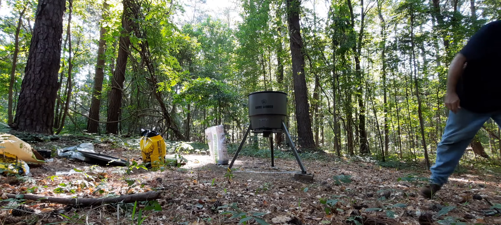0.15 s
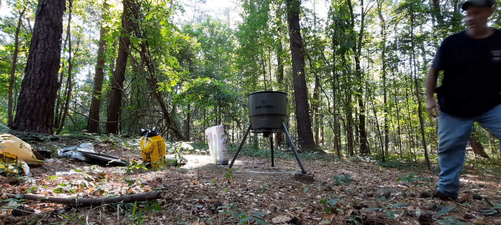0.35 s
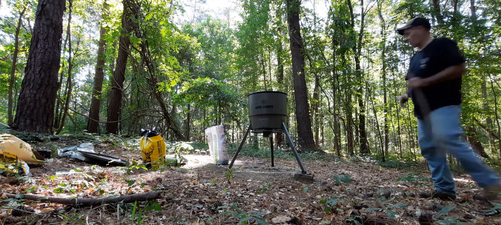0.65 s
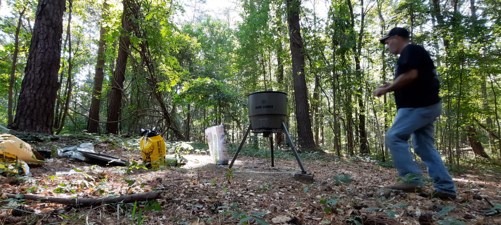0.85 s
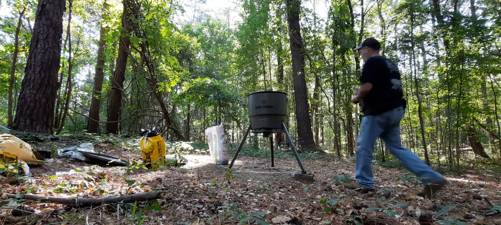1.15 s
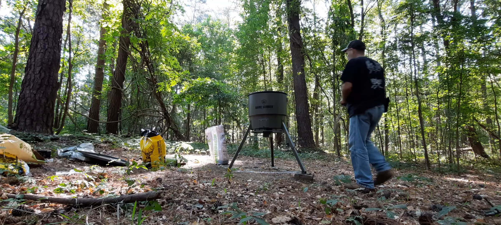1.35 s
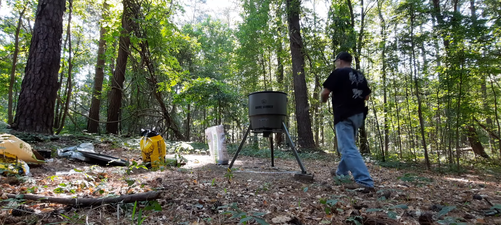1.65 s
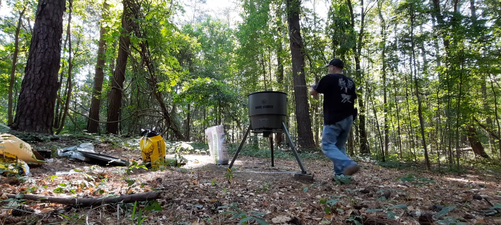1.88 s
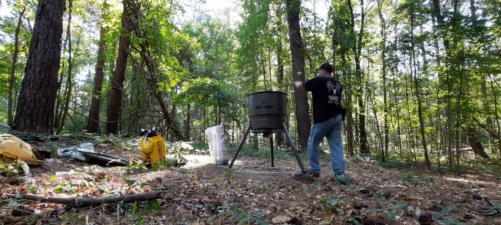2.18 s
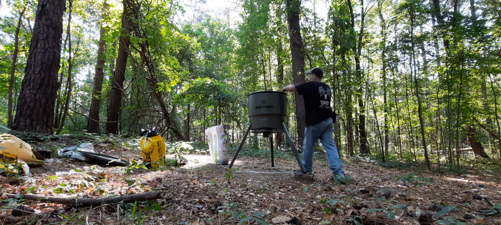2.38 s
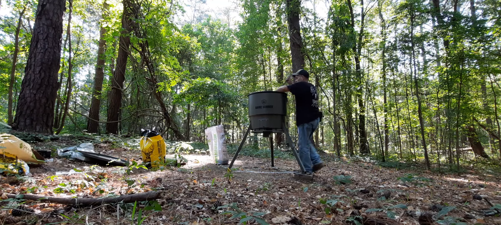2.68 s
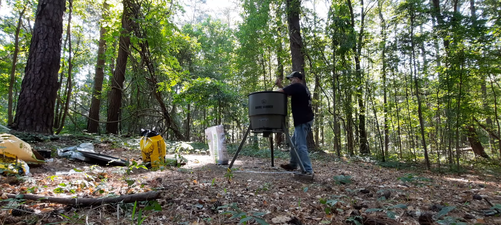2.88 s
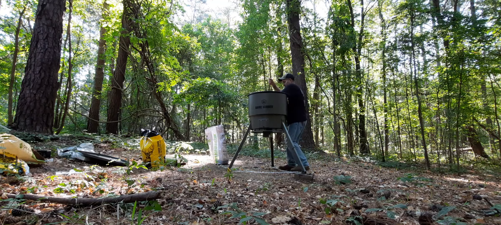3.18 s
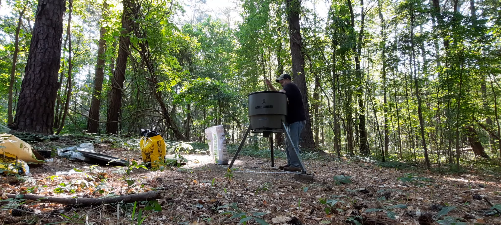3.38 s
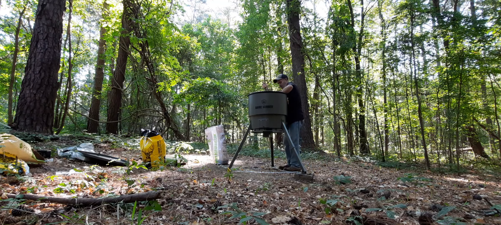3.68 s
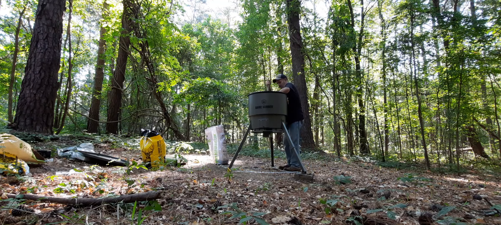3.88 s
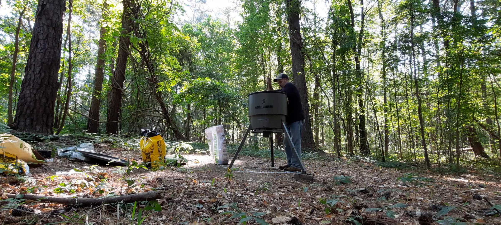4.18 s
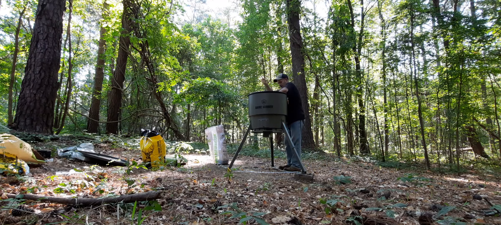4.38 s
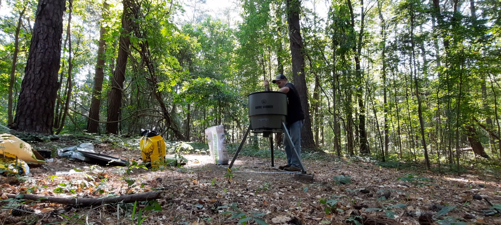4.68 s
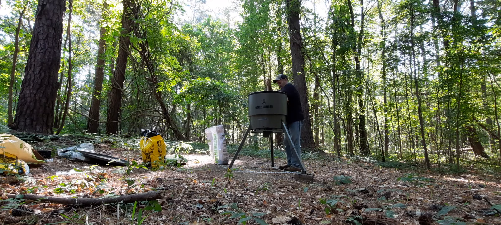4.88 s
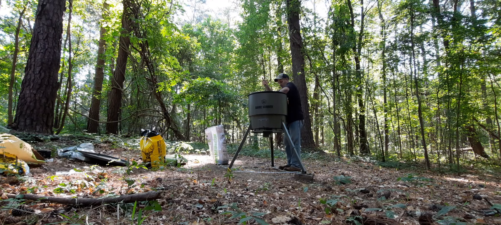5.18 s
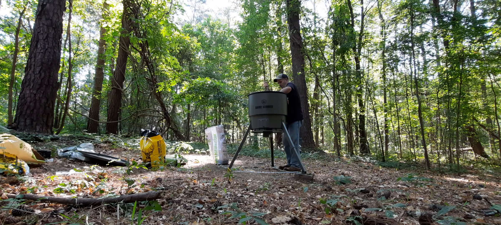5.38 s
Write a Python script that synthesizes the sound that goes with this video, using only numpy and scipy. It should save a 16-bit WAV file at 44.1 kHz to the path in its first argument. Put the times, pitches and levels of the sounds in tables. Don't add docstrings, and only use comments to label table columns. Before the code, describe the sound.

Footsteps crunch through dry leaves and snapping twigs in a quiet wood, then corn rattles into a drum hopper in growing surges.

```python
import sys
import numpy as np
from scipy import signal
from scipy.fft import rfft, irfft, next_fast_len
from scipy.io import wavfile
from scipy.ndimage import uniform_filter1d

SR = 44100
rng = np.random.default_rng(int(sys.argv[2]) if len(sys.argv) > 2 else 0)


def gain_from_decibels(decibels):
    exponent = np.asarray(decibels, float) / 20
    return 10 ** exponent


def unload_wav(signal):
    wavfile.write(
        sys.argv[1],
        SR,
        np.round(np.clip(np.atleast_2d(signal).T, -1, 1) * 32767).astype(np.int16),
    )


N = 244314
SIZE = next_fast_len(N + 8192)
HZ = np.maximum(np.arange(SIZE // 2 + 1) * SR / SIZE, 1)
POUR_START_S = 2.86

# time_s, level_db
RUMBLE = [(0.0, -67), (0.23, -58.5), (0.46, -61.5), (1.46, -60), (1.5, -65), (1.8, -56.5), (1.9, -71),
          (1.94, -54.5), (2.33, -65.5), (2.56, -57.5), (3.55, -57), (3.59, -50), (4.4, -53.5),
          (4.95, -46.5), (5.15, -50.5), (5.54, -48)]
# frequency_hz, density_db
GROUND_SPECTRUM = [(15, -65), (28, -37), (50, -7), (101, -0.5), (122, 0.5), (140, -18), (179, -8.5),
                   (260, -33.5), (340, -33), (570, -120)]
# frequency_hz, width_hz, level_db
STAND_MODES = [(124.5, 34, 2.5), (168.7, 28.3, 4.5), (185.4, 31.6, 1)]
# frequency_hz, density_db
WOOD_SPECTRUM = [(150, -25), (230, -1), (320, 3), (430, -11), (900, -4), (1570, -3.5), (3000, -10.5),
                 (4500, -18), (5600, -11.5), (6700, -12), (9550, -24), (10700, -21), (11300, -12.5),
                 (12000, -22), (16000, -27)]
# frequency_hz, likeness (0 to 1)
WOOD_ALIKE = [(60, 0.9), (130, 0.97), (200, 0.96), (290, 0.69), (640, 0), (1400, 0.)]
# frequency_hz, likeness (0 to 1)
NEAR_ALIKE = [(100, 1), (300, 0.99), (700, 0.84), (1500, 0.91), (3000, 0.8), (7000, 0.26), (15000, 0.44)]
# frequency_hz, lag_samples
PORT_LAG = [(500, 2), (2700, 2.1), (7000, 1.61), (14000, 3.37)]

# peak_s, rise_s and fall_s over 20 dB, crisp_db, sole_weight_db
STEPS = [(.22, 0.46, 0.63, -67, -9), (.354, 0.049, 0.27, -69.5, 1), (.848, 0.0047, 0.34, -50, -6.5),
         (.93, 0.072, 0.17, -56, 3.5), (.971, 0.062, 0.2, -47.5, 0), (1.019, 0.16, .1, -49.5, -2),
         (1.06, 0.11, 0.051, -49.5, -0.5), (1.13, .15, 0.15, -61.5, 0), (1.27, 0.12, 0.19, -64.5, -9),
         (1.49, 0.023, 0.1, -64, -6), (1.665, 0.078, 0.36, -63.5, -4), (1.916, 0.1, 0.088, -61, -14),
         (2.0, 0.024, 0.048, -57.5, 5), (2.04, 0.089, 0.18, -60, -5.5), (2.39, 0.19, 0.17, -70, 1),
         (2.74, 0.02, 0.064, -64, 3), (2.83, .1, 0.069, -78, 11), (2.93, 0.051, 0.16, -53.5, -7)]
# frequency_hz, density_db
LEAF_SPECTRUM = [(3500, -28), (5000, -11), (6000, -10.5), (7600, -12.5), (11000, -12), (16000, -7)]
TWIG_SPECTRUM = [(2400, -65), (2700, 1.5), (3500, 0), (4500, -3.5), (6000, -17)]
SOLE_SPECTRUM = [(90, -88), (150, -8.5), (400, 1), (700, -11), (1000, -5), (1600, -6.5), (2100, -5),
                 (2400, -38)]
# time_s, peak_db, edge_db and middle_db re peak
TWIGS = [(0.045, -60, -20, -25), (0.095, -61.5, -21, -25), (0.135, -56, -20, -25), (0.179, -54, -14, -7),
         (0.207, -47, -22, -13), (0.849, -30.5, -12, -17), (0.8615, -36, -13, -18), (0.902, -46, -17, 7),
         (0.962, -40, -1, -20), (0.965, -32, -1, -18), (0.9958, -43, -2, 10), (1.0116, -34, -5, -2),
         (1.039, -39, 1, -3), (1.071, -50, -12, 3), (1.37, -55, -16, -26), (1.486, -56, -20, -26),
         (1.894, -53, -7, -20), (1.9808, -31.5, -7.5, -40), (1.984, -32, -8, -43), (1.9868, -28, -7, -40),
         (2.1779, -57, 0, -22), (2.3945, -52, -6, -22), (2.6044, -67, 6, -15), (2.733, -52.5, -5, -12),
         (2.82, -58, 2, -10)]
# time_s, peak_db, heaviness_db
CLUMPS = [(2.92, -44, 4), (3.0415, -59, -15.5), (3.064, -41, 9.5), (3.09, -31.5, 1), (3.193, -50, 8),
          (3.254, -40, 3), (3.2783, -40, -2), (3.308, -42, 8), (3.393, -50.5, 15), (3.628, -31, -12),
          (3.64, -28, -17), (3.7035, -31, -42), (3.8417, -39, -8), (4.1995, -33, -16), (4.2475, -28.5, 3.5),
          (4.261, -35, 6), (4.2687, -29, 8), (4.2914, -23.5, 2), (4.306, -25, 2), (4.3094, -27, -8),
          (4.317, -39, 17), (4.57, -37, -13), (4.995, -30, -7), (4.999, -34, 4.5), (5.065, -34, -2.5),
          (5.1467, -36, -17), (5.1735, -27.5, 2), (5.324, -31, -13)]
CLUMP_SHARES_DB = [-16, -44, -18.5]
# low_hz, high_hz, level_db
SNAP_BANDS = [(11400, 21000, 7), (5180, 8900, 11.5), (3040, 4600, 13), (550, 2600, 13)]

# time_s, pitch_hz, level_db
WHISTLE = [
    (.05, 3440, -76),
    (.1, 3460, -70),
    (.2, 3380, -65),
    (.27, 3240, -64),
    (.34, 3160, -64),
    (.42, 3140, -73),
    (.6, 3110, -80),
    (.75, 3100, -92),
]
# time_s, pitch_hz, level_db
SEEP = [
    (.7, 8720, -84),
    (.76, 8680, -73),
    (.82, 8580, -72),
    (.86, 8500, -78),
]
# time_s, pitch_hz, level_db
CHIRP = [
    (1.43, 1980, -80),
    (1.47, 2090, -71),
    (1.51, 2020, -71),
    (1.54, 1770, -67),
    (1.57, 1630, -71),
    (1.63, 1650, -76),
    (1.7, 1750, -82),
]
# time_s, pitch_hz, level_db
COO = [
    (1.4, 1607, -76),
    (1.46, 1650, -67),
    (1.53, 1555, -73),
    (1.56, 1560, -92),
]

# time_s, peak_db
TICKS = [(.8617, -37), (.8676, -40), (.9657, -32), (.9693, -37), (1.0126, -33), (1.049, -40), (1.3857, -58),
         (1.6157, -59), (1.9528, -57), (2.1256, -58), (2.3646, -59), (2.9198, -44), (3.0427, -49),
         (3.1183, -31), (3.1286, -31), (3.1935, -40), (3.3069, -42), (3.5518, -45), (3.5807, -40),
         (3.624, -31), (3.64, -21), (3.6784, -28), (3.7055, -29), (3.7245, -24), (3.7274, -28),
         (3.7588, -30), (3.8416, -32), (3.8602, -28), (4.2473, -20), (4.25, -31), (4.2522, -31),
         (4.2613, -29), (4.2695, -22), (4.3055, -22), (4.31, -21), (4.3165, -22), (4.381, -25),
         (4.4774, -24), (4.5422, -25), (4.5699, -30), (4.5979, -30), (4.6692, -22), (4.7735, -22),
         (4.9345, -29), (4.9949, -27), (5.0623, -19), (5.1466, -32), (5.2061, -30), (5.2516, -34),
         (5.2952, -35), (5.3145, -35), (5.3219, -27), (5.3249, -31), (5.3491, -32), (5.434, -25),
         (5.5098, -26)]

# peak_s, rise_s and fall_s over 20 dB, flow_db, upper_wall_share_db
SURGES = [(2.93, 0.039, 0.071, -58.5, -1.5), (2.982, 0.041, 0.025, -49, -1), (3.07, 0.014, 0.11, -45, -20),
          (3.118, 0.051, 0.058, -41, -6), (3.17, 0.26, 0.13, -51.5, 3), (3.27, 0.026, 0.56, -56, 2.5),
          (3.61, 0.18, .1, -56.5, 9), (3.627, 0.0096, 0.35, -39.5, -6.5), (3.645, 0.045, .08, -36.5, -12),
          (3.765, 0.045, .04, -38, -14), (3.845, .015, .06, -40, -12), (3.76, 0.23, 0.28, -36.5, -6),
          (3.85, 0.022, 0.18, -39.5, -3.5), (3.885, 0.12, 0.11, -40.5, 0), (3.94, 0.16, 0.21, -39.5, 1),
          (4.1, 0.15, 0.99, -64, 14), (4.23, 0.21, .3, -50, 1), (4.2, .006, .1, -46, -12),
          (4.27, .004, .06, -40, -8), (4.293, 0.01, .15, -39.5, -3.5), (4.325, 0.062, 0.13, -27.5, -10),
          (4.5, 0.37, 0.74, -36.5, -6), (4.7, 0.17, 0.22, -29, -9.5), (4.775, 0.17, 0.19, -32, 0),
          (4.81, 0.06, 0.26, -33.5, -0.5), (4.91, 0.29, 0.03, -38.5, -2), (5.045, 0.25, 0.06, -43, 0.5),
          (5.066, .012, 0.055, -34, -7), (4.997, .006, .1, -39.5, -5.5), (5.148, .006, .1, -39.5, -8),
          (5.174, 0.12, 0.09, -33.5, -9), (5.27, 0.37, 0.6, -45.5, -2), (5.323, .008, .05, -42, -14),
          (5.434, 0.045, .04, -35, -10), (5.455, 0.15, 0.19, -36.5, -0.5), (5.54, 0.078, .1, -30, -5)]
# peak_s, rise_s and fall_s over 20 dB, strength_db, air_push_db
SLIDES = [(2.97, 0.081, 0.064, -57.5, 4), (3.08, 0.022, 0.1, -53.5, 4.5), (3.15, 0.091, 0.2, -49, -10),
          (3.21, 0.16, 0.079, -54.5, 2), (3.4, 1, 1, -58.5, 4), (3.65, 0.27, 0.19, -42.5, -2.5),
          (3.77, 0.49, 0.11, -39.5, -23), (3.92, 0.24, 0.21, -37, -4), (4.1, 0.32, 0.19, -48.5, 6.5),
          (4.2, 0.14, 0.17, -51.5, 10), (4.32, 0.19, 0.16, -40.5, -21), (4.43, 0.22, 0.21, -43.5, 2.5),
          (4.57, 0.24, 1, -40, -4), (4.706, 0.071, 0.38, -32, -9.5), (4.85, 0.25, 0.28, -44, 0),
          (4.97, 0.16, 0.18, -50.5, 10.5), (5.07, 0.057, 0.37, -44.5, -24), (5.22, 0.1, 0.26, -50, 5),
          (5.36, 0.14, 0.29, -44.5, 0), (5.46, 0.24, 0.63, -37, -10.5)]
# frequency_hz, density_db
KERNEL_SPECTRUM = [(3300, -29), (4600, -7.5), (6400, -5), (8000, -3), (9500, -2.5), (11500, 2.5),
                   (13300, 3.5), (14500, 4.5), (16000, 4)]
# frequency_hz, width_hz, level_db
LOWER_WALL_MODES = [(796, 105, -4.5), (969, 52, 1.5), (1020, 142, -2), (1190, 131, -1), (1481, 197, -2.5),
                    (1563, 143, 2), (1650, 360, -6)]
UPPER_WALL_MODES = [(2080, 560, -5), (2580, 410, 0), (3120, 330, -3), (3510, 470, -0.5), (4370, 5300, -8.5)]
CAVITY_MODES = [(281.5, 129, -3), (299.4, 45, 4.5), (330.6, 29.5, 2.5), (371, 47.5, -1), (441, 89, -10)]
# time_s, pitch_hz
SPOT = [(3.0, 1460), (3.15, 1730), (3.4, 910), (3.55, 990), (3.66, 1520), (3.78, 1710), (3.87, 1170),
        (3.93, 1440), (4.1, 1330), (4.4, 1340), (4.62, 1650), (4.7, 1260), (4.9, 1290), (5.1, 1840),
        (5.3, 1090), (5.54, 1430)]

# time_s, peak_db, pitch_hz, rattle_t60_s
KNOCKS = [(3.292, -47, 1280, 0.074), (3.4944, -52, 1050, 0.069), (3.533, -71, 940, 0.08),
          (3.6497, -29, 1390, 0.14), (3.7688, -29, 1860, 0.11), (3.8013, -22.5, 1570, 0.076),
          (3.8601, -37, 1070, 0.073), (3.9194, -23, 1360, 0.12), (3.9465, -31, 1370, 0.16),
          (4.1738, -34, 2100, 0.08), (4.2537, -35, 1070, 0.1), (4.4324, -32, 1160, 0.08),
          (4.484, -23.5, 1590, 0.08), (4.521, -23, 1160, 0.053), (4.558, -24, 1470, 0.08),
          (4.5824, -40, 1430, 0.071), (4.6147, -21.5, 1680, 0.093), (4.6938, -20, 1260, 0.11),
          (4.804, -33, 1490, 0.067), (4.878, -21, 1190, 0.091), (5.1097, -22.5, 2280, 0.074),
          (5.1741, -42, 1760, 0.087), (5.3204, -39, 1090, 0.073), (5.3601, -23.5, 1270, 0.094),
          (5.41, -30, 1350, 0.084), (5.4526, -26, 1270, 0.071)]
# time_s, peak_db, pitch_hz, rattle_t60_s
HIGH_KNOCKS = [(3.6252, -30, 3420, 0.084), (3.8733, -17.5, 3460, 0.077), (3.947, -25, 3180, 0.066),
               (4.2692, -33, 3300, 0.09), (4.2922, -25, 2640, 0.07), (4.434, -26, 2540, 0.081),
               (4.5411, -28, 2520, 0.098), (4.596, -27, 3000, 0.078), (4.6299, -24, 3600, 0.069),
               (4.6943, -19, 3360, 0.078), (4.7552, -27, 2590, 0.067), (4.9951, -30.5, 3400, 0.07),
               (5.0642, -35, 2320, 0.06), (5.1506, -45, 2490, 0.09), (5.175, -29, 2470, 0.067),
               (5.3617, -37, 2270, 0.06), (5.3912, -40, 3230, 0.06), (5.43, -27, 3300, 0.12),
               (5.4575, -20, 3540, 0.07), (5.508, -21, 2820, 0.065)]
# time_s, peak_db, pitch_hz, rattle_t60_s
THUMPS = [(3.065, -75, 323, 0.1), (3.804, -34, 350, 0.088), (3.934, -36, 367, 0.12), (4.005, -35, 348, 0.1),
          (4.188, -28.5, 301, 0.088), (4.427, -25.5, 316, 0.11), (4.528, -29, 315, 0.11),
          (4.632, -35, 356, 0.1), (4.7, -27.5, 357, 0.22), (4.755, -27.5, 346, 0.14),
          (4.815, -39, 441, 0.078), (4.953, -32, 344, 0.11), (5.225, -34, 306, 0.1),
          (5.315, -37, 304, 0.077), (5.416, -32.5, 350, 0.13), (5.476, -32, 367, 0.15)]

# start_s, end_s, low_hz, high_hz
GAPS = [
    (.852, .92, 1900, 2200),
    (.9, .99, 1900, 2650),
    (1.012, 1.07, 2250, 2750),
    (1.04, 1.052, 2600, 2950),
    (1.035, 1.072, 2100, 2600),
    (.828, .84, 9400, 10600),
    (.828, .84, 11600, 12400),
    (.999, 1.005, 7000, 8600),
    (1.001, 1.008, 14800, 16500),
    (1.968, 1.978, 8600, 10400),
]


def rms_one(x):
    return x / np.sqrt(np.mean(x ** 2) + 1e-20)


def pan(left_over_right_db):
    return gain_from_decibels([[left_over_right_db / 2], [-left_over_right_db / 2]])


def in_time(points):
    s, *columns = np.transpose(points)
    return [np.interp(np.arange(N) / SR, s, c) for c in columns]


def at_hz(points):
    hz, value = np.transpose(points)
    return np.interp(np.log(HZ), np.log(hz), value)


def colour(x, spectrum):
    cepstrum = irfft(np.log(gain_from_decibels(at_hz(spectrum))), SIZE)
    cepstrum[1:SIZE // 2] *= 2
    cepstrum[SIZE // 2 + 1:] = 0
    return irfft(rfft(x, SIZE) * np.exp(rfft(cepstrum)), SIZE)[..., :N]


def resonate(x, modes):
    out = 0
    for k, (hz, width_hz, level_db) in enumerate(modes):
        r = np.exp(-np.pi * width_hz / SR)
        zeros = [(1 - r * r) / 2, 0, (r * r - 1) / 2]
        poles = [1, -2 * r * np.cos(2 * np.pi * hz / SR), r * r]
        out = out + (-1) ** k * gain_from_decibels(level_db) * signal.lfilter(zeros, poles, x)
    return out


def drift(rate_hz):
    r = np.exp(-64 * np.pi * rate_hz / SR)
    slow = signal.lfilter([1], [1, -2 * r, r * r], rng.standard_normal(N // 32 + 1002))[1000:]
    return np.interp(np.arange(N) / 32, np.arange(len(slow)), rms_one(slow))


def grains(per_s, spread_db, clump_db):
    sizes = gain_from_decibels(spread_db * np.minimum(rng.exponential(1, (2, N)), 4.2))
    signs = rng.choice([-1, 1], (2, N))
    struck = rng.random((2, N)) < per_s / SR
    return sizes * signs * struck * gain_from_decibels(clump_db * drift(25))


def swells(rows):
    s, rise_s, fall_s, peak_db, share_db = np.transpose(rows)[:, :, None]
    t = np.arange(0, N + 32, 32) / SR - s
    away = np.where(t < 0, -t / np.maximum(rise_s, .002), t / np.maximum(fall_s, .01))
    shape_db = peak_db - 20 * away
    levels = []
    for extra_db in (0, share_db):
        total_db = 10 * np.log10(np.sum(gain_from_decibels(2 * (shape_db + extra_db)), axis=0) + 1e-11)
        levels.append(np.interp(np.arange(N) / 32, np.arange(len(total_db)), total_db))
    return levels


def ports(pair, alike, lag_samples):
    shared, other = rfft(pair, SIZE)
    like = np.clip(at_hz(alike), 0, .999)
    left = np.sqrt(1 + like) * shared + np.sqrt(1 - like) * other
    right = np.sqrt(1 + like) * shared - np.sqrt(1 - like) * other
    delay = np.exp(-2j * np.pi * HZ * lag_samples / SR)
    return irfft([left * delay, right], SIZE)[:, :N] / np.sqrt(2)


def wood():
    rumble_db, = in_time(RUMBLE)
    loaded = np.clip((np.arange(N) / SR - POUR_START_S) / 0.21, 0, 1)
    ground = gain_from_decibels(-3 * loaded) * rms_one(colour(rng.standard_normal((2, N)), GROUND_SPECTRUM))
    stand = gain_from_decibels(-0.5) * loaded * rms_one(resonate(rng.standard_normal((2, N)), STAND_MODES))
    rumble = gain_from_decibels(rumble_db + 0.07 + 1.44 * drift(1.0)) * (ground + stand)
    hiss = gain_from_decibels(-66) * rms_one(colour(rng.standard_normal((2, N)), WOOD_SPECTRUM))
    return ports(rumble + hiss, WOOD_ALIKE, 6.0) * pan(.8)


def insects():
    band = [(5630, 380, 0)]  # frequency_hz, width_hz, level_db
    chorus = resonate(resonate(rng.standard_normal((2, N)), band), band)
    return gain_from_decibels(-67 + 1.6 * drift(23)) * rms_one(chorus)


def steps():
    crisp_db, thud_db = swells(STEPS)
    crunch_db = -56.5 + 1.45 * (crisp_db + 53.0)
    crisp = gain_from_decibels(crisp_db + 4) * rms_one(colour(grains(6000, 3.0, clump_db=1.5), LEAF_SPECTRUM))
    crunch = gain_from_decibels(crunch_db) * rms_one(colour(grains(3000, 1.6, clump_db=3.5), TWIG_SPECTRUM))
    thud = gain_from_decibels(thud_db - 5.0) * rms_one(colour(grains(1200, 1.4, clump_db=-1.5), SOLE_SPECTRUM))
    return ports(crisp + crunch + thud, NEAR_ALIKE, 8.2) * pan(1.5)


def snaps():
    t = np.arange(2000) / SR
    twig_body_db, twig_t60_s, clump_t60_s = -20.5, 0.0095, 0.02
    hits = [(*row, twig_body_db, twig_t60_s) for row in TWIGS]
    for s, peak_db, heavy_db in CLUMPS:
        hits.append((s, peak_db, *np.add(CLUMP_SHARES_DB, heavy_db), clump_t60_s))
    bursts = rng.standard_normal((len(hits), 4, 2, len(t)))
    parts = np.zeros((4, 2, N + len(t)))
    for (s, peak_db, *shares_db, t60_s), burst in zip(hits, bursts):
        start = round(s * SR)
        fade = (1 - np.exp(-t / 0.0002)) * gain_from_decibels(peak_db - 60 * t / t60_s)
        shares = gain_from_decibels(np.array([0, *shares_db]))[:, None, None]
        parts[..., start:start + len(t)] += fade * burst * shares
    out = 0
    for (low_hz, high_hz, level_db), part in zip(SNAP_BANDS, parts):
        band = signal.butter(3, [low_hz, high_hz], "band", fs=SR, output="sos")
        out = out + gain_from_decibels(level_db) * signal.sosfilt(band, part[:, :N] + 1e-18)
    return ports(out, NEAR_ALIKE, at_hz(PORT_LAG))


def bird(notes, blur_hz):
    hz, level_db = in_time(notes)
    sample = np.arange(N)
    on = (sample > notes[0][0] * SR) & (sample < notes[-1][0] * SR)
    waver = drift(36.6)
    tone = np.sin(2 * np.pi * np.cumsum(hz + blur_hz * waver) / SR)
    flicker_db = 4 * (waver[::-1] + 0.5)
    return gain_from_decibels(level_db + flicker_db) * on * tone


def trunks(x, t60_s):
    t = np.arange(SR // 2) / SR
    tail = rng.standard_normal((2, len(t))) * gain_from_decibels(-60 * t / t60_s)
    return signal.fftconvolve(x[None], tail / np.sqrt(np.sum(tail ** 2) / 2), axes=1)[:, :N]


def birds():
    undertone = [(s, .76 * hz, db) for s, hz, db in WHISTLE]
    whistle = bird(WHISTLE, 45.0) + gain_from_decibels(-11) * bird(undertone, 48)
    chirp = bird(CHIRP, 35) + bird(COO, 35) + bird(SEEP, 15.0)
    direct = gain_from_decibels(-6) * whistle + gain_from_decibels(-2.5) * chirp
    return direct + gain_from_decibels(1) * trunks(whistle, 1.0) + gain_from_decibels(-4) * trunks(chirp, 0.5)


def ticks():
    t = np.arange(300) / SR
    bursts = rng.standard_normal((len(TICKS), 2, len(t))) * gain_from_decibels(-60 * t / .0035)
    bursts = signal.sosfilt(signal.butter(1, 11000, "high", fs=SR, output="sos"), bursts)
    out = np.zeros((2, N + len(t)))
    for (s, peak_db), burst in zip(TICKS, bursts):
        start = round(s * SR)
        click = burst / np.abs(burst).max(axis=1, keepdims=True)
        out[:, start:start + len(t)] += gain_from_decibels(peak_db + 5) * click
    return ports(out[:, :N], NEAR_ALIKE, at_hz(PORT_LAG)) * pan(1.8)


def wall(modes, per_s, tilt_db, patchy_db):
    blows = grains(per_s, 1.59, clump_db=0.5)
    spot_hz, = in_time(SPOT)
    out = 0
    for k, mode in enumerate(modes):
        octaves_off = np.log2(mode[0] / spot_hz)
        spot_db = 4 * np.exp(-(octaves_off / 0.38) ** 2)
        drive_db = tilt_db * np.log2(mode[0] / 1200) + patchy_db * drift(4.2) + spot_db
        out = out + (-1) ** k * gain_from_decibels(drive_db) * resonate(blows, [mode])
    return out


def pour():
    flow_db, upper_db = swells(SURGES)
    lower_db, boom_db = swells(SLIDES)
    swell_db = lower_db - uniform_filter1d(lower_db, SR)
    tilt_db = 0.7 * swell_db + 0.21 * (lower_db + 46)
    crackle = gain_from_decibels(flow_db + 4.5) * rms_one(colour(grains(7000, 2.4, clump_db=.8), KERNEL_SPECTRUM))
    upper = gain_from_decibels(upper_db + 3.0) * rms_one(wall(UPPER_WALL_MODES, 5000, 0, patchy_db=1.0))
    even_drive = np.std(resonate(grains(3460, 2.35, clump_db=1.5), LOWER_WALL_MODES))
    lower = gain_from_decibels(lower_db - 3.0) * wall(LOWER_WALL_MODES, 4000, tilt_db, patchy_db=1.37) / even_drive
    boom = gain_from_decibels(boom_db - 0.8) * rms_one(resonate(grains(1500, 3.74, clump_db=2.0), CAVITY_MODES))
    begun = np.clip((np.arange(N) / SR - POUR_START_S) / 0.028, 0, 1)
    return ports(begun * (crackle + upper + lower + boom), NEAR_ALIKE, at_hz(PORT_LAG)) * pan(1.8)


def knocks(rows, relative_width, gain_db):
    t = np.arange(5000) / SR
    out = np.zeros((2, N + len(t)))
    bursts = rng.standard_normal((len(rows), 2, len(t)))
    for (s, peak_db, hz, t60_s), burst in zip(rows, bursts):
        start = round(s * SR)
        ring = rms_one(resonate(burst, [(hz, relative_width * hz, 0)]))
        fade = (1 - np.exp(-t / 0.011)) * gain_from_decibels(peak_db + gain_db - 60 * t / max(t60_s, .01))
        out[:, start:start + len(t)] += ring * fade
    return ports(out[:, :N], NEAR_ALIKE, at_hz(PORT_LAG)) * pan(1.8)


def scene():
    background = wood() + insects() + birds()
    walk = steps() + snaps() + ticks()
    lumps = knocks(KNOCKS, 0.25, -6.0) + knocks(HIGH_KNOCKS, 0.061, -5.5) + knocks(THUMPS, 0.059, -4.0)
    return background + walk + pour() + lumps


def top_cut(x):
    return signal.sosfilt(signal.butter(12, 16880, fs=SR, output="sos"), x)


def record(dry):
    mix = signal.sosfilt(signal.ellip(12, .5, 58, 15750, fs=SR, output="sos"), dry)
    t = np.arange(N) / SR
    for start_s, end_s, low_hz, high_hz in GAPS:
        inside = (HZ > low_hz) & (HZ < high_hz)
        band = irfft(rfft(mix, SIZE) * inside, SIZE)[:, :N]
        mix = mix - band * np.clip(np.minimum(t - start_s, end_s - t) / .004 + .5, 0, 1)
    return top_cut(mix)


dry = scene()
out = record(dry)
unload_wav(out)
```